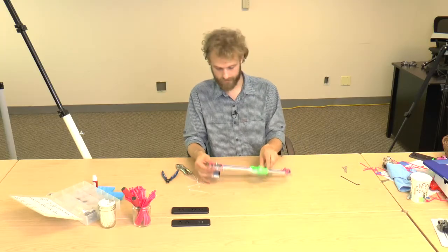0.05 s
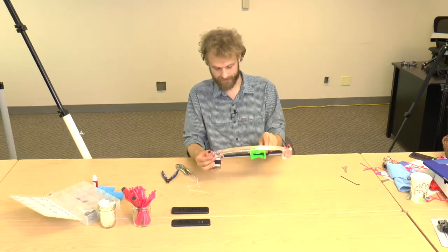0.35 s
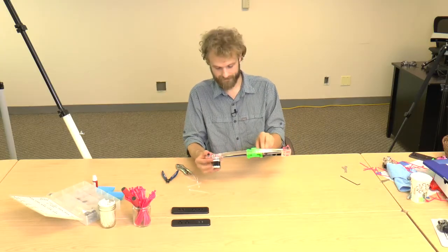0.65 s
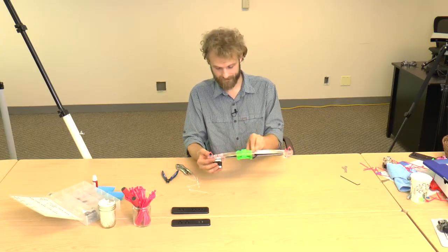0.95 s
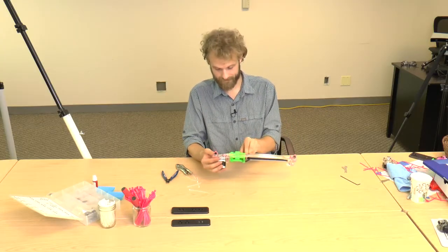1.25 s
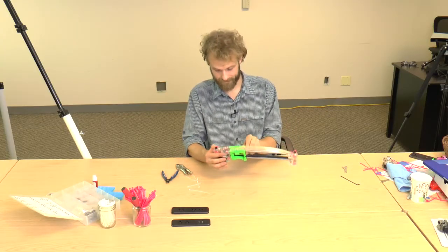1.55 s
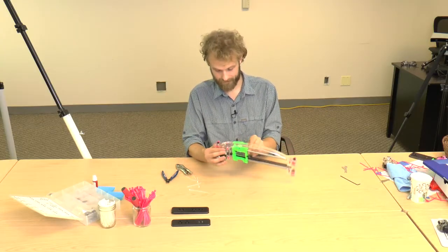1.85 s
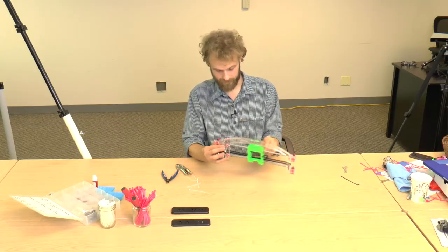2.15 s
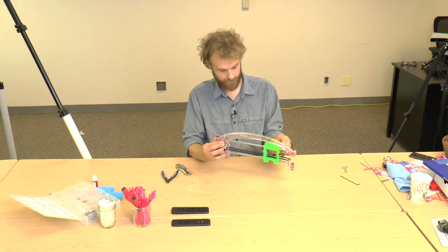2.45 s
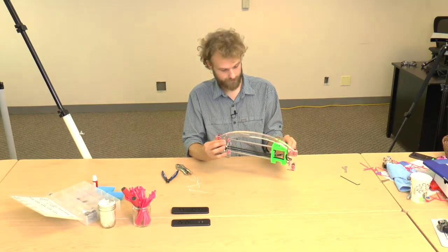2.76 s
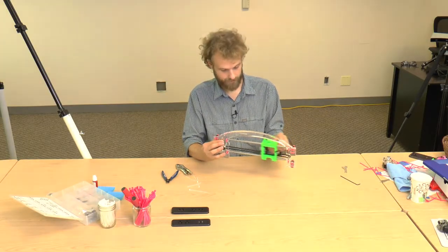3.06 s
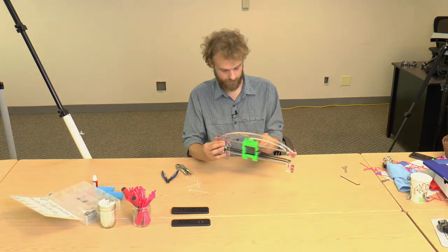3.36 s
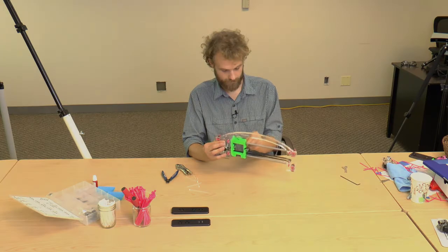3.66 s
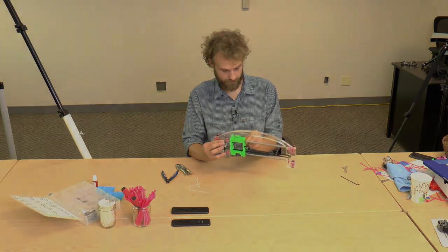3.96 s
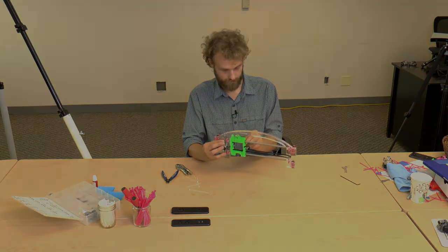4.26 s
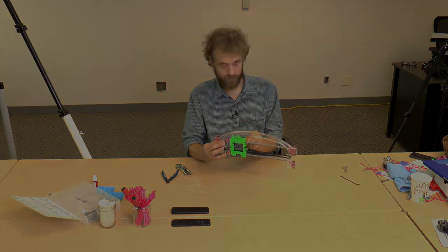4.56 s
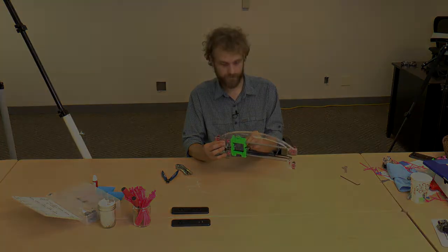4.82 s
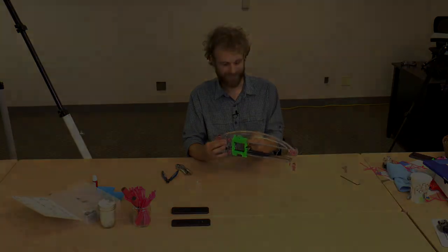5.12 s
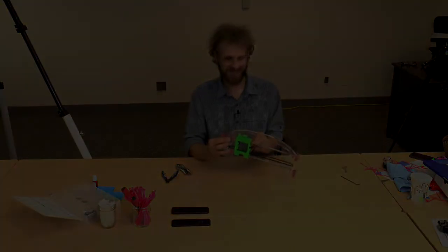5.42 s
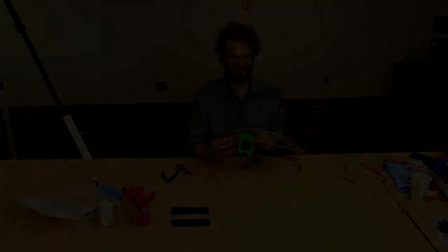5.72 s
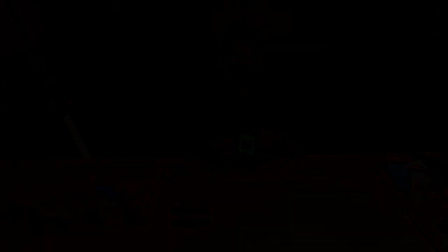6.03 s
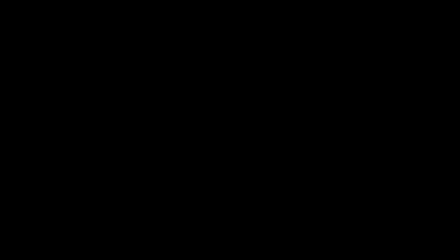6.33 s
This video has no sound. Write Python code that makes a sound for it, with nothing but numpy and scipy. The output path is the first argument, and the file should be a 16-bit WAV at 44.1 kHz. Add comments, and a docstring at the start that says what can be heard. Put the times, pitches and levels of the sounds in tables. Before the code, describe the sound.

Close metallic rasps of a bearing carriage pushed back and forth on its rail, with two sharp clacks, light finger ticks and room hum.

```python
"""Ventilation drones in a room as fingers tap a machine part, close to the microphone.
A hand pushes a small ball-bearing carriage along its steel rail three times. The balls rasp in their
track, louder with speed, and the loose carriage rattles and twice clacks against an end stop.
Then fingers tick on plastic ties. The volume dips after each hard clack, and the scene fades out."""
import sys
import numpy as np
from scipy import signal
from scipy.fft import rfft, irfft, next_fast_len
from scipy.io import wavfile
from scipy.ndimage import map_coordinates

SR = 44100
rng = np.random.default_rng(int(sys.argv[2]) if len(sys.argv) > 2 else 0)


def generate_wav(signal):
    """Clip the signal to [-1, 1] and save it as 16-bit WAV at the path in sys.argv[1]."""
    frames = np.transpose(np.atleast_2d(signal))
    scaled = np.clip(frames, -1, 1) * 32767
    pcm = np.round(scaled).astype(np.int16)
    wavfile.write(sys.argv[1], SR, pcm)


N = 286076
TIME = np.arange(N) / SR
AGE = np.arange(SR // 4) / SR  # seconds since a hit

# How loud the rasp is as the hand speeds up and slows, one list per push: time_s, level_db
PUSHES = [
    [(0.56, -60), (0.638, -46.5), (0.758, -44), (0.818, -38), (1.076, -32.5), (1.1, -32.5), (1.186, -30),
     (1.19, -30)],
    [(1.78, -54.5), (1.84, -53), (1.924, -38), (2.014, -32), (2.356, -34), (2.42, -36.5), (2.59, -39),
     (2.64, -47.5), (2.645, -53.5)],
    [(2.87, -62), (2.916, -50), (3.044, -35.5), (3.272, -32), (3.542, -36), (3.632, -33), (3.637, -29.5)],
]


def amp(db):
    """Turn decibels into a gain."""
    return 10 ** (np.asarray(db) / 20)


def unit(x):
    """Scale a sound to an average (rms) level of 1."""
    return x / np.sqrt(np.mean(x ** 2) + 1e-20)


def along(points, hz):
    """Read between (pitch_hz, value) points, with octaves evenly spaced."""
    pitches, values = np.transpose(points)
    return np.interp(np.log(hz + 1), np.log(pitches), values)


def dying(t, decay_s):
    """A fade that falls 60 dB in decay_s."""
    return np.exp(-np.log(1000) * t / np.maximum(decay_s, 1e-4))


def wobble(rate):
    """A smooth curve through `rate` random values a second."""
    coarse = TIME[::32]
    values = rng.standard_normal(int(N * rate / SR) + 4)
    return np.interp(TIME, coarse, map_coordinates(values, [coarse * rate]))


def filtered(x, response):
    """Scale each frequency f in a sound by response(f)."""
    size = next_fast_len(len(x) + SR // 4)
    return irfft(rfft(x, size) * response(np.fft.rfftfreq(size, 1 / SR)), size)[:len(x)]


def resonate(x, modes):
    """Pass a sound through resonances: pitch_hz, width_hz, level_db."""
    def response(f):
        return sum((-1) ** k * amp(db) * 1j * f * width / (hz * hz - f * f + 1j * f * width)
                   for k, (hz, width, db) in enumerate(modes))
    return unit(filtered(x, response))


def band(x, hz, width):
    """Keep the part of a sound near one pitch."""
    b, a = signal.iirpeak(min(hz, .45 * SR), hz / (1.55 * width), fs=SR)
    return unit(signal.lfilter(b, a, signal.lfilter(b, a, x)))


def noise(spectrum, size):
    """Noise shaped by (pitch_hz, level_db) points."""
    return unit(filtered(rng.standard_normal(size), lambda f: amp(along(spectrum, f))))


def ringing(modes, rise_s):
    """The dying tones of a struck part, a little different at every blow."""
    chance = rng.random((len(modes), 2))
    ring = sum(amp(db + 2 * luck - 2.5) * dying(AGE, decay_s) * np.sin(2 * np.pi * (hz * AGE + phase))
               for (hz, db, decay_s), (luck, phase) in zip(modes, chance))
    return ring * (1 - np.exp(-AGE / rise_s))


def add(track, start_s, sound):
    """Mix a sound into a track at start_s."""
    part = track[max(round(start_s * SR), 0):][:len(sound)]
    part += sound[:len(part)]


def ventilation(rumble_db=-33.5, sink_db_per_s=0.5, air_db=-39, drone_db=-35.5):
    """Air rumbles and rushes, the duct and room boom, and a motor and electronics hum."""
    # Tone of the low rumble and of the rushing air: pitch_hz, level_db
    rumble_shape = [(14, -49), (24, -20), (32, -8), (42, -2.5), (60, -5), (76, -4.5), (92, -14.5),
                    (140, -30.5), (400, -77.5)]
    air_shape = [(60, -42), (105, -14.5), (135, -7.5), (232, -9.5), (324, -15), (478, -17.5), (600, -22),
                 (780, -24), (950, -31), (1580, -34), (2400, -39.5), (4500, -47), (15500, -52.5)]
    # Resonances of the duct and room: pitch_hz, width_hz, level_db
    duct_modes = [(118.9, 9.1, 2), (153, 10, -5.5), (168.9, 6.7, -2), (189.5, 10, -.5), (236, 18, -5.5),
                  (342.6, 40, -12)]
    # Steady tones of the motor and electronics: pitch_hz, level_db
    hum_tones = [(119.7, -6.5), (358, -20.5), (479, -20.5), (1195, -29.5), (3908, -38), (7811, -40),
                 (15628, -40.5)]
    # Brief swells of the boom: peak_s, boost_db, half_length_s
    swells = [(0.03, 5.5, 0.16), (1.5, 4, .25), (4.015, 7, .14)]
    rumble = amp(rumble_db - sink_db_per_s * TIME + 1.5 * wobble(3)) * noise(rumble_shape, N)
    air = amp(air_db) * noise(air_shape, N)
    duct = resonate(rng.standard_normal(N), duct_modes)
    boom = unit(filtered(duct, lambda f: 1 / (1 + (f / 380) ** 4)))
    hum = sum(amp(db) * np.sqrt(2) * np.sin(2 * np.pi * hz * TIME + 0.42 * wobble(1.9))
              for hz, db in hum_tones)
    swell_db = sum(db * np.exp(-((TIME - peak_s) / length) ** 2) for peak_s, db, length in swells)
    return rumble + air + amp(drone_db) * (amp(swell_db - 1) * boom + amp(1.33) * hum)


def finger_ticks(width_octaves=.9, fiddle_start_s=5.55, fiddle_length_s=.9, count=10):
    """Each touch is a short puff of noise; fainter ones come at random as fingers work at the ties."""
    # Fingers touch the part and its plastic ties: start_s, level_db, pitch_hz, decay_s
    touches = [(0.003, -30, 490, 0.16), (0.1474, -37.5, 1620, 0.033), (0.586, -37.5, 3500, 0.013),
               (0.624, -36, 2800, 0.012), (0.634, -37.5, 10100, 0.014), (1.445, -52.5, 5000, .1),
               (5.127, -30, 11400, 0.0028), (5.1843, -33, 1200, 0.0097), (5.2808, -34, 12000, 0.018),
               (5.4, -45, 3160, .022), (5.4717, -42, 8930, 0.015), (5.5136, -42, 4500, .012),
               (5.651, -41, 3000, 0.016), (5.729, -45, 2500, .07), (5.76, -47, 2300, 0.13)]
    out = np.zeros(N)
    times = fiddle_start_s + fiddle_length_s * (np.arange(count) + rng.random(count)) / count
    faint = [(start_s, -54 + .5 * louder, 2700 * 2 ** (.4 * higher), 0.04)
             for start_s, (louder, higher) in zip(times, rng.standard_normal((count, 2)))]
    for start_s, db, hz, decay_s in touches + faint:
        hiss = rng.standard_normal(len(AGE))
        puff = filtered(hiss, lambda f: 1 / (1 + (np.log2((f + 1) / hz) / width_octaves) ** 2 / 2) ** 2)
        add(out, start_s, amp(db) * dying(AGE, decay_s) * unit(puff))
    return out


def rattles_and_clacks():
    """End stop and carriage take a knock at once; the loose balls pile up and the steel rings on."""
    # The loose carriage rocks on the rail: start_s, strength_db, ring_db
    rocking = [(0.2313, -30.5, -37), (1.2087, -25, -22), (1.2315, -20, -15.5), (1.2368, -22, -25),
               (2.6512, -28.5, -36), (2.6607, -30, -36), (3.6595, -26, -29), (3.6658, -28, -31)]
    # The carriage hits the end stop: start_s, thud_db, clack_db, chatter_db, ring_db, chatter_delay_s
    stop_hits = [(1.1934, -4.5, -1.5, -8, -12, 0.0032), (3.6410, 1, -6.5, -1.5, -16, 0.0022)]
    # Tones of the struck end stop, carriage frame and steel rail: pitch_hz, level_db, decay_s
    stop_tones = [(558.6, -4.5, 0.021), (1060, -17, 0.023)]
    frame_tones = [(740, -14, 0.043), (1300, -12, 0.022), (1698, -12.5, 0.015), (2100, -13, 0.015),
                   (2390, -9, 0.025), (2800, -8.5, 0.023), (3500, -9, 0.035), (4150, -19.5, 0.0088),
                   (4650, -22.5, 0.01)]
    steel_tones = [(1764, -8, 0.047), (2314, -21, .04), (3550, -12, 0.031), (5770, -22.5, .03),
                   (7700, -4, .04), (8150, -11.5, 0.044), (8760, -9.5, 0.037), (11000, -25, .03),
                   (12640, -13, .03), (13600, -12, .03)]
    # Tone of the balls chattering together: pitch_hz, level_db
    chatter_shape = [(500, -18), (1500, -14), (3000, 1), (5000, -3), (6800, -2.5), (7900, 4.5),
                     (9300, -4.5), (12300, -3), (16000, -15.5)]
    out = np.zeros(N)
    # A rattle is mostly chatter, with little thud.
    rattles = [(start_s, db - 15, db - 4, db, ring_db, .0012) for start_s, db, ring_db in rocking]
    for start_s, thud_db, clack_db, chatter_db, ring_db, delay_s in stop_hits + rattles:
        crack = amp(-6) * dying(AGE, 0.022) * band(rng.standard_normal(len(AGE)), hz=1878, width=990)
        thud = amp(thud_db) * ringing(stop_tones, rise_s=0.0005)
        clack = amp(clack_db) * (ringing(frame_tones, rise_s=0.00022) + crack)
        pile_up = (AGE / delay_s * np.exp(1 - AGE / delay_s)) ** 3  # peaks at delay_s
        chatter = amp(chatter_db - 3) * pile_up * noise(chatter_shape, len(AGE))
        ring = amp(ring_db) * ringing(steel_tones, rise_s=0.00069)
        add(out, start_s, thud + clack + chatter + ring)
    return out


def carriage_motion(ease_in_s=0.039, stop_s=.006, db_per_speed_doubling=11, free_ring_db=13.5):
    """Follow the pushes: the rasp's gain, the carriage's place (0 left, 1 right) and how much it rings."""
    # The carriage's trip along the rail in each push: from_place, to_place, ring_db
    trips = [(0.5, 0.06, -3), (0.026, 0.84, 0.14), (0.86, .08, 0.6)]
    gain, place, ring_db = np.zeros((3, N))
    for push, (origin, goal, grip_db) in zip(PUSHES, trips):
        times, levels = np.transpose(push)
        rasp_db = np.interp(TIME, times, levels)
        moving = np.clip((TIME - times[0]) / ease_in_s, 0, 1)
        moving *= np.exp(-(np.maximum(TIME - times[-1], 0) / stop_s) ** 2)
        gain += moving * amp(rasp_db)
        speed = moving * 2 ** (rasp_db / db_per_speed_doubling)
        begun = TIME > times[0]
        place = np.where(begun, origin + (goal - origin) * np.cumsum(speed) / speed.sum(), place)
        ring_db = np.where(begun, grip_db + 0.11 * (rasp_db - levels.max()), ring_db)
    free = 1 / (1 + np.exp((0.31 - place) / .08))  # the holding hand damps the left third of the rail
    return gain, place, ring_db + free_ring_db * free


def rolling_balls(impacts_per_s=1400, impact_share=.35, flutter_db=0.38, surge_db=1.3, wander_db=1.7):
    """Balls jostle in the track: rubbing and tiny impacts make the carriage, rail and balls ring."""
    # Resonances of the carriage, the rail and the balls: pitch_hz, width_hz, level_db
    carriage_modes = [(1005, 210, -15), (1316, 220, -12), (1636, 220, -8), (1836, 200, -2.5),
                      (2140, 240, 0.5), (2693, 320, -6), (3060, 200, -7.5), (3370, 200, -6.5)]
    rail_modes = [(504, 110, -10.5), (718, 150, -8.5), (1320, 770, -3.5), (2450, 1200, -4), (3740, 1100, 2),
                  (4170, 370, -3), (4860, 980, 0), (5730, 1400, -1), (6940, 620, -5.5)]
    ball_modes = [(7890, 370, 1), (8790, 540, -4.5), (10100, 580, -7), (11170, 920, -6.5),
                  (12800, 1500, -4.5), (15070, 2000, -4)]
    gain, place, ring_db = carriage_motion()
    size = round(PUSHES[-1][-1][0] * SR) + SR // 10  # until just after the last push
    impacts = unit((rng.random(size) < impacts_per_s / SR) * rng.standard_normal(size))
    load = amp(flutter_db * wobble(160) + surge_db * wobble(22))[:size]  # shifts from ball to ball
    force = load * np.sqrt(impact_share * impacts ** 2 + 1 - impact_share)
    tilt_db_per_octave = 6 * (.5 - place[:size])  # the carriage sounds darker towards the right
    out = np.zeros(N)
    for modes, part_db in [(carriage_modes, ring_db - 5.5), (rail_modes, -0.5), (ball_modes, -5)]:
        rasp = np.zeros(size)
        for hz, width, db in modes:
            tilt_db = tilt_db_per_octave * np.log2(hz / 2000) if modes is carriage_modes else 0
            level = amp(db + tilt_db + wander_db * wobble(12)[:size])
            rasp += level * band(force * rng.standard_normal(size), hz, width)
        out[:size] += (amp(part_db) * gain)[:size] * unit(rasp)
    return out


def room_echo(x, rise_s=0.0048):
    """The walls answer with a short, blurred echo."""
    # How long the room rings: pitch_hz, decay_s
    decays = [(200, 0.1), (2000, 0.36), (6000, 0.31), (15000, 0.082)]
    hz, t, spectrum = signal.stft(rng.standard_normal(SR // 2), SR, nperseg=256)
    tail = signal.istft(spectrum * dying(t, along(decays, hz)[:, None]), SR, nperseg=256)[1]
    tail *= 1 - np.exp(-np.arange(len(tail)) / SR / rise_s)
    return signal.fftconvolve(x, tail / np.linalg.norm(tail))[:N]


def scene():
    """The handling, its echo and the ventilation all reach one close microphone."""
    handling = rolling_balls() + rattles_and_clacks() + finger_ticks()
    mono = handling + amp(-22.5) * room_echo(handling) + ventilation()
    return np.array([mono, mono])


def record(dry, threshold_db=-6, ceiling=.8, fade_end_s=6.733, fade_length_s=3.41, top_hz=15900):
    """The volume drops on a loud peak and creeps back; peaks are rounded off and the sound fades out."""
    mono = dry.mean(axis=0)
    over_db = np.maximum(20 * np.log10(np.abs(mono) + 1e-9) - threshold_db, 0)
    recovery_db = 16 * TIME
    held_peak_db = np.maximum.accumulate(over_db + recovery_db) - recovery_db
    dipped = mono * amp(-.6 * held_peak_db)
    rounded = dipped / (1 + (dipped / ceiling) ** 8) ** (1 / 8)
    fade = np.clip((fade_end_s - TIME) / fade_length_s, 0, 1) ** 1.195
    out = filtered(rounded * fade, lambda f: 1 / (1 + (f / top_hz) ** 120))  # cut the highest treble
    return np.array([out, out])


dry = scene()
out = record(dry)
generate_wav(out)
```